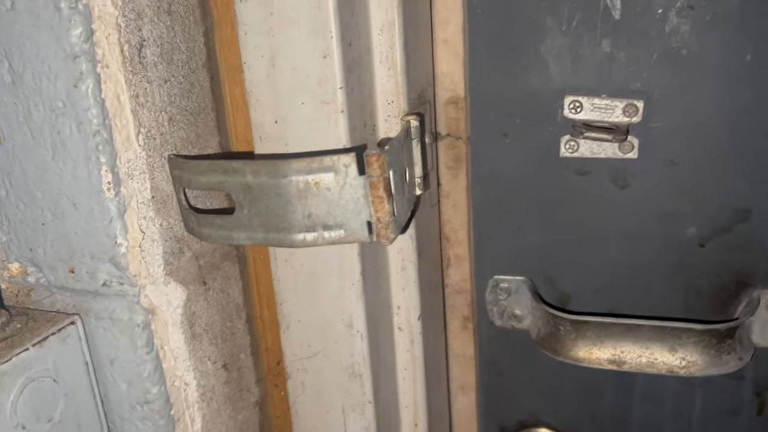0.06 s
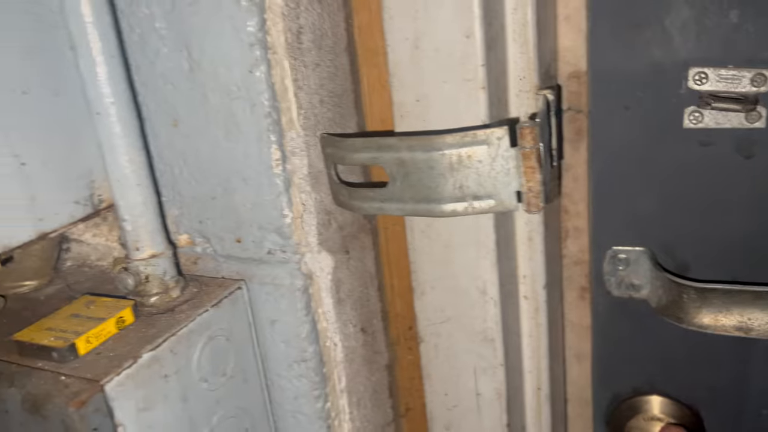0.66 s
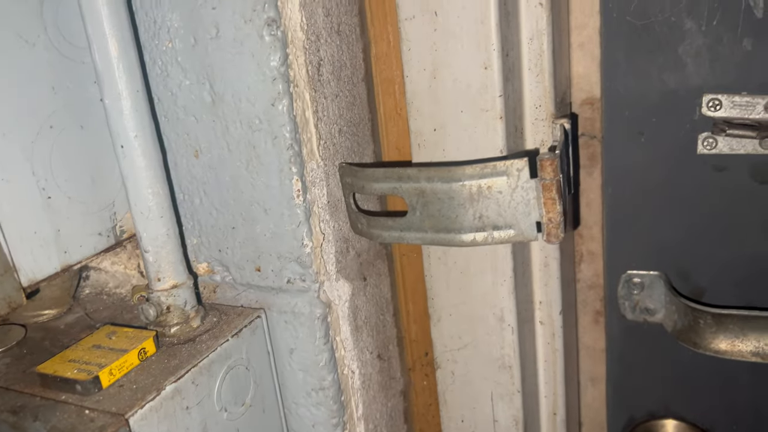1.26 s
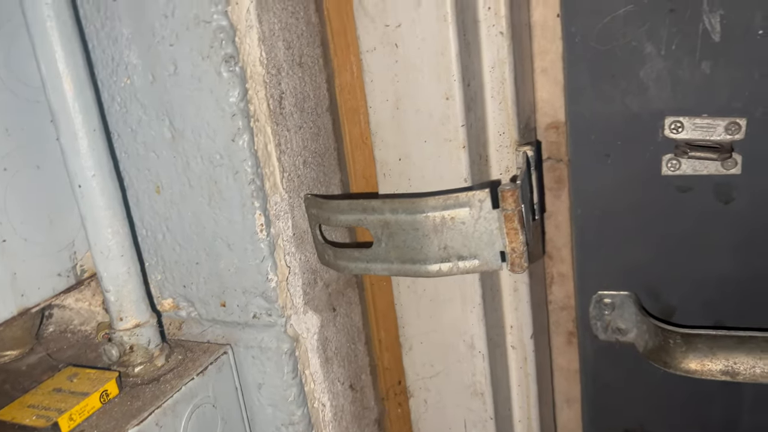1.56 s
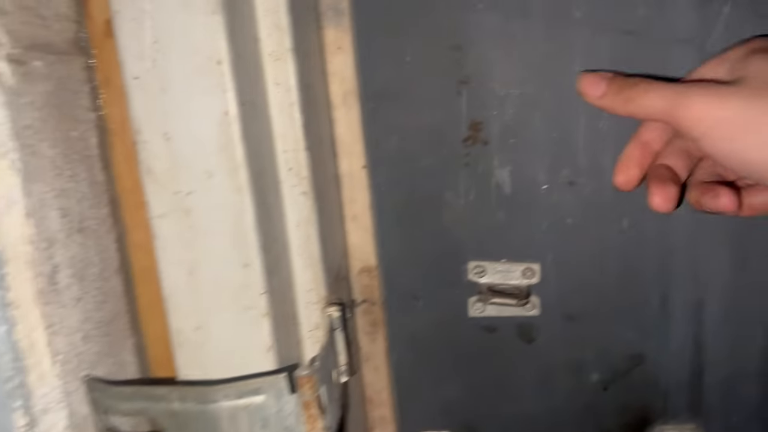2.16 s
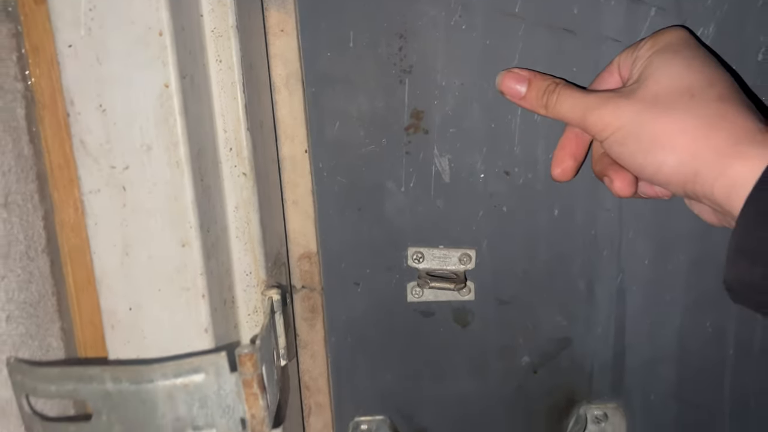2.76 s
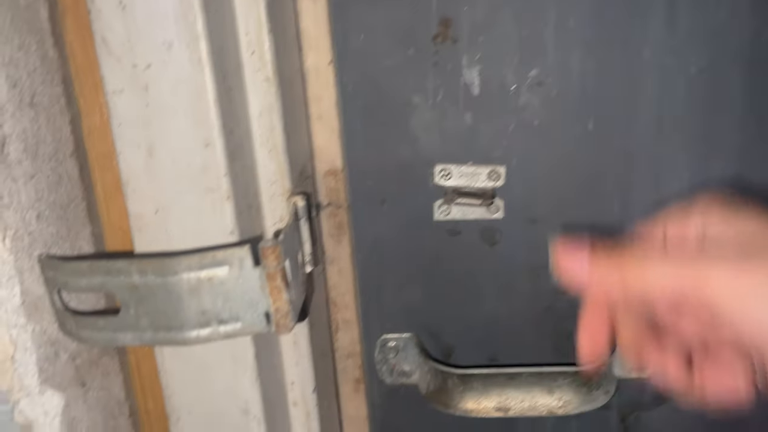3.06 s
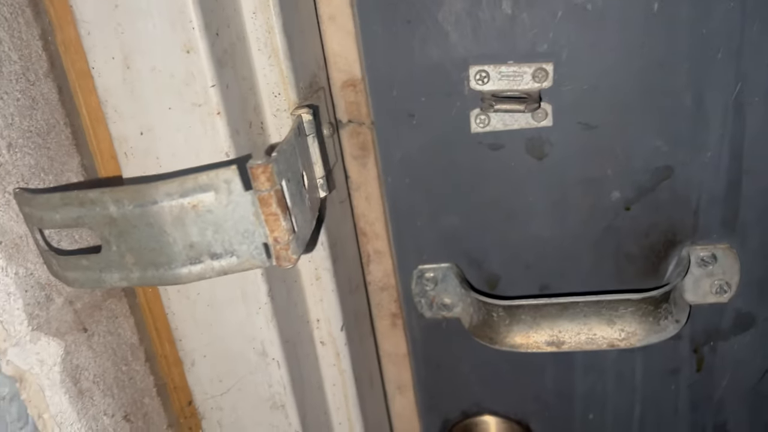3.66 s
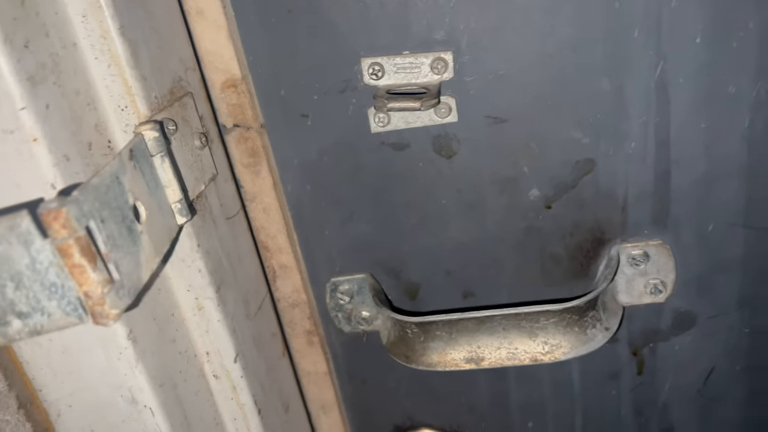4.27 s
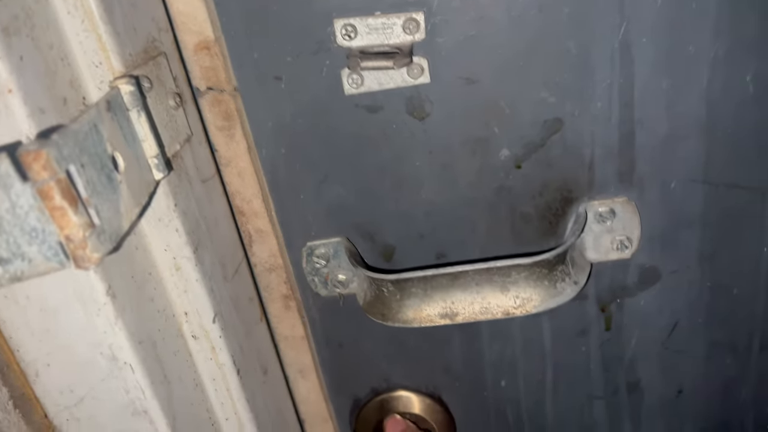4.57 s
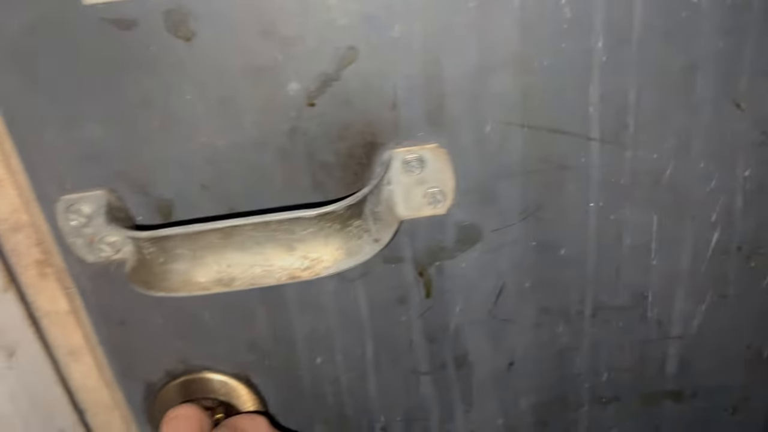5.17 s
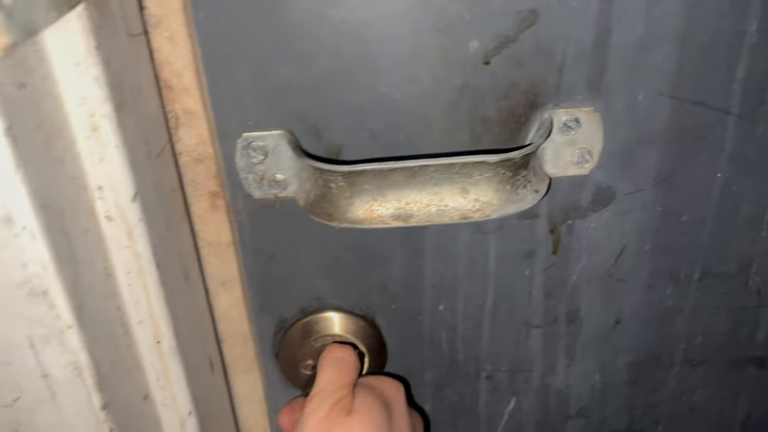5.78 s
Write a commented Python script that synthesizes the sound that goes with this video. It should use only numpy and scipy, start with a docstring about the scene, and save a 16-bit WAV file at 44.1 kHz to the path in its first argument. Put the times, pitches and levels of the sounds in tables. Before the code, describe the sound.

In a quiet corridor with a faint motor drone, mains hum and airy hiss, someone tests a locked metal door right by the microphone. Light knocks and sharp latch clicks come first. Then cloth swishes, a hand thumps the door, and it bangs against its frame with a deep boom and a short metallic ring. A lighter clang, soft pats, small clicks and a faint snap follow.

```python
"""A locked steel door tried by hand, close to a stereo microphone in a quiet building.
From the start, a distant motor drones and the mains hum over a soft hiss of air. After a dry snap
the latch chatters and scrapes, metal on metal, and the leaf knocks lightly against its frame.
Just after two seconds the sleeve swishes, the hand lands and the whole leaf booms and clangs.
One more clang follows near three seconds, then only soft bumps, pats, latch clicks and a last snap."""
import sys
import numpy as np
from scipy import signal
from scipy.fft import rfft, irfft, next_fast_len
from scipy.io import wavfile
from scipy.ndimage import uniform_filter1d

SR = 44100
rng = np.random.default_rng(int(sys.argv[2]) if len(sys.argv) > 2 else 0)


def transcribe(u):
    """Save the signal u as a 16-bit wav file named by the first command-line argument.

    u: samples, shape (n,) or (channels, n), limited to [-1, 1]; the rate is SR.
    q: integer samples, one column per channel.
    """
    v = np.clip(np.atleast_2d(u).T, -1, 1)
    q = np.round(v * 32767).astype(np.int16)
    wavfile.write(sys.argv[1], SR, q)


N = 265745

# Where the close sounds sit at the microphone. Each row: frequency in Hz, left minus right in dB.
CLOSE_LEAN = [(60, -0.5), (170, -1), (350, -5.5), (700, -4), (1200, 0.5), (2200, -3.5), (5000, 1),
              (15000, -2)]
# How alike noise is on the two channels. Each row: frequency in Hz, correlation from -1 to 1.
CORRELATION = [(60, 0.47), (130, 0.76), (290, 0.38), (640, -0.59), (1400, -0.34), (3000, 0.025),
               (7000, -0.17), (15000, -0.4)]
# Room tone of the building. Each row: frequency in Hz, relative density in dB.
AIR_COLOUR = [(22, -27), (48, -5), (100, 2), (170, -11.5), (520, -23.5), (1000, -17.5), (1480, -18),
              (1720, -14), (1900, -21), (2900, -38.5), (4000, -37.5), (5400, -51.5), (6500, -46.5),
              (7200, -36.5), (7550, -45.5), (8100, -34.5), (9600, -47), (15500, -49.5)]
# Where the room tone sits. Each row: frequency in Hz, left minus right in dB.
AIR_LEAN = [(60, -0.5), (200, -1), (400, -3.5), (800, 7.5), (1300, 8), (2300, 18.5), (4400, 12.5),
            (7200, 16.5), (9000, -5.5), (15000, 10)]
# Swells in the room tone's bass. Each row: time in seconds, bass gain in dB.
RUMBLE = [(0, 15), (.3, -5), (.6, 2), (1.1, -0.5), (2.2, 2.5), (6.03, 3.5)]
# The distant motor. Each row: time in seconds, level of the shaft tone in dB, of its octave in dB.
MOTOR_LEVELS = [(0, -73, -73), (.7, -52.5, -69), (1.6, -59.5, -69.5), (3.1, -52, -51), (4.5, -51, -54),
                (6.03, -58.5, -64)]
# Mains hum in the corridor. Each row: multiple of HUM_HZ, level in dB.
HUM_PARTIALS = [(2, -72.5), (4, -64.5), (5, -76.5), (6, -80.5), (7, -79), (9, -77.5), (10, -74.5),
                (11, -74.5), (12, -80)]
# Thin buzz of an electrical fitting. Each row: multiple of HUM_HZ, level in dB.
BUZZ_PARTIALS = [(25, -86.5), (30, -88.5), (31, -85), (33, -92), (34, -88), (37, -90.5), (67, -102.5)]
# Dry snaps close to the microphone. Each row: start in seconds, level in dB, t60 in seconds.
SNAPS = [(0.0126, -45, 0.0049), (2.365, -57.5, .03), (5.8792, -60.5, 0.023)]
# Colour of a snap. Each row: frequency in Hz, relative density in dB.
SNAP_COLOUR = [(300, 4), (2200, 1.5), (4500, -7), (7000, -4.5), (12000, -3), (15500, 4.5)]
# Latch and fittings click and scrape, too light to move the leaf. Each row: start in seconds,
# chatter length in seconds, favoured pitch in Hz, strength in dB, tilt in dB per octave.
LATCH_CONTACTS = [ (0.082, .030, 2180, -52.5, -1.04), (1.087, 0.0052, 400, -68.5, -5.4),
                  (1.102, 0.044, 1850, -54, -3), (1.138, 0.0096, 2080, -41.5, 0.1),
                  (1.475, .002, 256, -60.5, -4), (1.513, .002, 1310, -65, -6),
                  (2.322, 0.021, 825, -68, -6.5), (2.363, 0.0027, 2380, -65.5, -4.5),
                  (2.4, 0.0069, 3750, -38, -2.5), (2.884, 0.021, 1070, -62, -4),
                  (3.819, .002, 850, -70.5, -7.5), (5.055, 0.016, 775, -57, -5.5),
                  (5.217, 0.024, 1090, -58, -2), (5.239, 0.0095, 2400, -60, 0)]
# The leaf hits its frame; a harder blow has a flatter tilt. Each row: start in seconds, chatter length
# in seconds, favoured pitch in Hz, strength in dB, tilt in dB per octave, thump of the leaf in dB.
FRAME_KNOCKS = [ (0.397, .012, 1270, -47.5, -7, -54), (0.524, .003, 2200, -56, -8, -58),
                (0.530, .006, 1290, -50, -5.5, -42.5), (0.587, .004, 220, -78.5, -8.5, -52),
                (1.542, .003, 150, -70.5, -3.5, -47), (2.172, .002, 563, -65.5, -12.5, -33),
                (2.191, .005, 172, -63.5, -10.5, -30), (2.404, .006, 284, -36, -4, -16.5),
                (2.920, .003, 2420, -45.5, -3.5, -40.5), (2.927, .005, 440, -52.5, -8, -34),
                (3.125, .014, 460, -68, -5, -61)]
# Soft bumps of the door. Each row: start in seconds, strength in dB.
BUMPS = [(1.443, -73), (3.7, -85), (4.038, -84.5), (4.439, -84), (5.017, -65.5), (5.406, -76.5)]
# Modes of the steel leaf and its fittings. Each row: frequency in Hz, weight in dB, t60 in seconds.
DOOR_MODES = [(145.2, 9, 0.33), (166, -16, 0.8), (228.5, 2.5, 0.3), (280.7, 6, 0.17), (323.8, -1.5, 0.29),
              (421, -4, 0.24), (472.5, -2.5, 0.16), (508.5, -5.5, 0.16), (616, -2.5, 0.17), (664.4, 1, 0.1),
              (738, 2, 0.16), (903, -10, 0.29), (990, 1.5, 0.14), (1180, 14, 0.11), (1282, -1, 0.34),
              (1342, 4.5, 0.15), (1386, 2, 0.23), (1715, -3, 0.33), (1845, 0, 0.17), (1960, -1, 0.036),
              (1955, 2.5, 0.22), (2180, -6, 0.21), (2365, -1, 0.22), (2522, 2, 0.09), (2920, 0, 0.12),
              (3216, 5.5, 0.14), (4310, 4.5, 0.22), (4600, 3, 0.26), (5550, -13, 0.15), (6078, 1, 0.21),
              (6440, 2, 0.37)]
# Dense, quickly dying vibration of the steel sheet. Each row: frequency in Hz, relative density in dB.
SHEET_COLOUR = [(40, 10), (130, 0.5), (280, 0), (390, -2.5), (700, -0.5), (900, 1), (1400, 0), (2400, 3.5),
                (3300, -7), (4700, 1.5), (6800, -16), (9000, -24), (12000, -27), (15500, -23.5)]
# The door's body, clank, clang, click and tick. Each row: low and high edge in Hz, rise and t60
# in seconds, relative level of the room tail in dB, of the clear modes in dB.
REGISTERS = [(167.3, 427, 0.0013, 0.12, -10.5, 0), (504, 1002, 0.0011, 0.077, -15, -3),
             (1286, 2160, 0.00061, 0.11, -16.5, -5), (2550, 3650, 0.002, 0.063, -17.5, -5.5),
             (6520, 33000, 0.00041, 0.07, -17, -42)]
# How readily each register sounds, before the tilt. Each row: middle frequency in Hz, gain in dB.
REGISTER_RESPONSE = [(250, 0), (700, 3), (1700, 5.5), (3500, -1.2), (11000, 0)]
# Moves of the arm. Each row: fastest moment in seconds, level in dB, swell and fade time in seconds.
SWISHES = [(1.78, -65.5, 0.14), (2.22, -52.5, .035), (2.41, -49, 0.058), (2.89, -56, 0.037),
           (3.25, -69.5, 0.24), (5.02, -73, .05)]
# Colour of the rubbing cloth. Each row: frequency in Hz, relative density in dB.
SLEEVE_COLOUR = [(300, 6), (2000, 19), (4000, 10), (6000, 2.5), (9000, 3.5), (12000, 3.5), (14000, 15.5),
                 (16000, 8)]
# The hand lands on the leaf. Each row: start in seconds, pitch in Hz, level in dB, t60 in seconds.
PATS = [(2.1697, 528, -39.5, 0.053), (2.174, 150, -36.5, 0.073), (5.017, 303, -47, 0.034),
        (5.408, 295, -64, 0.042)]

HUM_HZ, MOTOR_HZ = 119.98, 47.6
ROOM_T60 = 0.34  # seconds for the corridor to fall by 60 dB


def amp(db):
    """Decibels to gain."""
    return 10 ** (np.asarray(db) / 20)


def unit_rms(x):
    """Scales to rms 1."""
    return x / np.sqrt(np.mean(x ** 2) + 1e-20)


def unit_blow(x):
    """Scales a blow so that its energy equals rms 1 held for 60 ms."""
    return x / np.sqrt(np.mean(x ** 2) * x.shape[-1] / (.06 * SR) + 1e-20)


def decay(t, t60):
    """Falls by 60 dB in t60 seconds."""
    return np.exp(-np.log(1000) * t / t60)


def at_hz(table, hz):
    """Reads a spectrum table along a log-frequency axis."""
    frequencies, values = np.transpose(table)
    return np.interp(np.log(hz + 1), np.log(frequencies), values)


def curves(table):
    """The columns of a time table at every sample."""
    times, *columns = np.transpose(table)
    return [np.interp(np.arange(N) / SR, times, column) for column in columns]


def add(mix, start, sound):
    """Mixes a sound in at a start in seconds."""
    part = mix[:, max(round(start * SR), 0):][:, :sound.shape[1]]
    part += sound[:, :part.shape[1]]


def sides(lean, hz):
    """Left and right gains for a table of level differences."""
    return amp(np.outer([.5, -.5], at_hz(lean, hz)))


def noise(size, colour, lean):
    """Coloured stereo noise, alike on both channels in the bass only."""
    hz = np.fft.rfftfreq(size, 1 / SR)
    spectra = rfft(rng.standard_normal((2, size)))
    alike = np.clip(at_hz(CORRELATION, hz), -1, 1)
    spectra[1] = alike * spectra[0] + np.sqrt(1 - alike ** 2) * spectra[1]
    return unit_rms(irfft(spectra * amp(at_hz(colour, hz)) * sides(lean, hz), size))


def drift(top_hz):
    """A random wander of rms 1, no faster than top_hz."""
    t = np.linspace(0, N / SR, num=600)
    rates = np.geomspace(top_hz / 10, top_hz, num=16)
    wave = sum(np.sin(2 * np.pi * (hz * t + rng.random())) / np.sqrt(hz) for hz in rates)
    return np.interp(np.arange(N) / SR, t, unit_rms(wave))


def room_tone(base_db=-53, bass_hz=350):
    """Still air hisses around the microphone while its bass swells and sinks."""
    air = amp(base_db) * noise(next_fast_len(N), AIR_COLOUR, AIR_LEAN)[:, :N]
    bass = signal.sosfiltfilt(signal.butter(2, bass_hz, fs=SR, output="sos"), air)
    return air + bass * (amp(curves(RUMBLE)[0]) - 1)


def motor(waver_db=0.75, speed_wander=0.0039):
    """A distant motor drones, dead centre, at its shaft rate and the octave above."""
    turns = np.cumsum(MOTOR_HZ * (1 + speed_wander * drift(8.22))) / SR
    return np.sqrt(2) * sum(amp(db + waver_db * drift(6.7)) * np.sin(2 * np.pi * order * turns)
                            for order, db in enumerate(curves(MOTOR_LEVELS), 1))


def mains_hum(waver_db=0.2, skew_rad=1.2):
    """Hum and buzz stand in the corridor and reach the two channels out of step."""
    cycles, skew = HUM_HZ * np.arange(N) / SR, np.array([[0], [skew_rad]])
    out = np.zeros((2, N))
    for multiple, db in HUM_PARTIALS + BUZZ_PARTIALS:
        peak = np.sqrt(2) * amp(db - waver_db * drift(1.9))
        out += peak * np.sin(2 * np.pi * (multiple * cycles + rng.random()) + skew)
    return out


def snaps(tail_db=-18.5, tail_t60=0.19):
    """Brief bright bursts close to the microphone, with a faint room tail."""
    t, out = np.arange(8192) / SR, np.zeros((2, N))
    for start, db, t60 in SNAPS:
        fade = decay(t, t60) + amp(tail_db) * decay(t, tail_t60)
        add(out, start, amp(db) * unit_blow(noise(len(t), SNAP_COLOUR, CLOSE_LEAN) * fade))
    return out


def chatter(length_s, per_second=350, rebound=0.31):
    """Energy of a first contact, then of uneven smaller ones while metal skids on metal."""
    jitter, size = rng.random((40, 2)).T
    times = (np.arange(len(jitter)) + jitter + .5) / per_second
    contacts = np.zeros(int(length_s * SR) + 2)
    contacts[0] = 1
    live = times < length_s
    contacts[(times[live] * SR).astype(int)] = (rebound * (.5 + size) ** 2)[live]
    return contacts


def register(hz, low_hz, high_hz):
    """Smooth, steep-sided weight of one range of pitches."""
    return 1 / np.sqrt((1 + (low_hz / (hz + 1)) ** 12) * (1 + (hz / high_hz) ** 12))


def favour(hz, pitch_hz, lift_db=6, octaves=0.18):
    """The striking point drives the door hardest near one pitch."""
    return amp(lift_db * np.exp(-.5 * (np.log2((hz + 1) / pitch_hz) / octaves) ** 2))


def contact_gain(middle_hz, pitch_hz, strength_db, tilt_db, pivot_hz=1000):
    """A soft contact gives less to the high registers; those around the favoured pitch get more."""
    tilted = amp(strength_db + tilt_db * np.log2(middle_hz / pivot_hz))
    return tilted * favour(middle_hz, pitch_hz, lift_db=5, octaves=0.55)


def mode_weights(scatter_db=2, apart_hz=1000):
    """Each blow weighs the modes anew, and short waves reach the two channels out of step."""
    hz, db, _ = np.transpose(DOOR_MODES)
    scatter, phase, side = rng.standard_normal((len(hz), 3)).T
    skew = np.sign(side) * np.minimum(hz / apart_hz, 1) * np.pi / 2
    angle = 2 * np.pi * phase + np.outer([.5, -.5], skew)
    return amp(db + scatter_db * scatter) * sides(CLOSE_LEAN, hz) * np.exp(1j * angle)


def strike(t, rings, length_s, pitch_hz, strength_db, tilt_db, thump_db=None):
    """Contacts shake the sheet and its modes: a crack, a short ring, then the room holds on."""
    sheet = noise(len(t), SHEET_COLOUR, CLOSE_LEAN)
    hz, mode_hz = np.fft.rfftfreq(len(t), 1 / SR), np.transpose(DOOR_MODES)[0]
    sheet_drive = rfft(sheet) * favour(hz, pitch_hz)
    mode_drive = mode_weights() * favour(mode_hz, pitch_hz)
    contacts = chatter(length_s)
    # the modes gather energy with every contact
    gathered = np.sqrt(np.interp(t, np.arange(len(contacts)) / SR, np.cumsum(contacts)))
    crack = amp(-2) * decay(t, t60=0.014)
    out = np.zeros_like(sheet) if thump_db is None else amp(thump_db) * thump(t, sheet)
    for (middle_hz, db), (*edges_hz, rise, t60, room_db, modes_db) in zip(REGISTER_RESPONSE, REGISTERS):
        onset = (1 - np.exp(-t / rise)) ** 2
        energy = decay(t, t60) ** 2 + crack ** 2 + (amp(room_db) * decay(t, ROOM_T60)) ** 2
        shaking = np.sqrt(abs(signal.oaconvolve(energy * onset ** 2, contacts)[:len(t)]))
        dense = irfft(sheet_drive * register(hz, *edges_hz)) * shaking
        clear = ((mode_drive * register(mode_hz, *edges_hz)) @ rings).real
        clear *= onset * uniform_filter1d(gathered, size=200)
        gain = amp(db) * contact_gain(middle_hz, pitch_hz, strength_db, tilt_db)
        out += gain * unit_blow(unit_blow(dense) + amp(modes_db) * unit_blow(clear))
    return out


def thump(t, sheet, flex_hz=76, swell_s=0.017, boom_hz=(44.5, 143), boom_db=-11, boom_t60=0.42):
    """The whole leaf flexes for a few cycles and leaves the corridor booming."""
    flex = -np.sin(2 * np.pi * flex_hz * t) * (t / swell_s * np.exp(-t / swell_s)) ** 2
    boom_band = signal.butter(4, boom_hz, btype="band", fs=SR, output="sos")
    boom = signal.sosfilt(boom_band, sheet * (1 - np.exp(-t / swell_s)) * decay(t, boom_t60))
    return unit_blow(flex) + amp(boom_db) * unit_blow(boom)


def door(flutter=0.56):
    """Close up, latch, knocks and bumps all ring the same modes, which reflections make flutter."""
    t, out = np.arange(24576) / SR, np.zeros((2, N))
    hz, _, t60 = np.transpose(DOOR_MODES)
    white = rng.standard_normal((2, len(hz), len(t)))
    ripple = unit_rms(uniform_filter1d(uniform_filter1d(white, size=500), size=400))
    reflections = 1 + flutter * (ripple[0] + 1j * ripple[1])
    rings = np.exp(2j * np.pi * np.outer(hz, t)) * decay(t, t60[:, None]) * reflections
    for start, *contact in FRAME_KNOCKS + LATCH_CONTACTS:
        add(out, start, strike(t, rings, *contact))
    for start, db in BUMPS:
        add(out, start, strike(t, rings, length_s=.003, pitch_hz=273, strength_db=db, tilt_db=-9.5))
    return out


def sleeve(rest_db=-78, grain_db=2):
    """Cloth near the microphone hisses unevenly, swelling and fading with each move of the arm."""
    t = np.arange(N) / SR
    swish_power = sum((amp(db) * np.exp(-abs(t - peak) / swell)) ** 2 for peak, db, swell in SWISHES)
    cloth = noise(next_fast_len(N), SLEEVE_COLOUR, CLOSE_LEAN)[:, :N]
    return cloth * np.sqrt(amp(rest_db) ** 2 + swish_power) * amp(grain_db * drift(40))


def hand_pats(rise_s=0.001, lag_rad=0.74):
    """The hand hits the leaf and damps it at once: a few hollow cycles, slightly later on the left."""
    t, out = np.arange(8192) / SR, np.zeros((2, N))
    for start, hz, db, t60 in PATS:
        tone = np.sin(2 * np.pi * hz * t - np.array([[lag_rad], [0]]))
        envelope = (1 - np.exp(-t / rise_s)) * decay(t, t60)
        add(out, start, amp(db) * unit_blow(tone * envelope * sides(CLOSE_LEAN, np.array([hz]))))
    return out


def scene():
    """Door, hand and arm close to the microphone, the building behind them."""
    close = door() + hand_pats() + snaps() + sleeve()
    return close + room_tone() + motor() + mains_hum()


def record(dry):
    """The recorder cuts the treble above 15.9 kHz."""
    low_pass = signal.firwin(511, 15900, window=("kaiser", 9), fs=SR)
    return signal.oaconvolve(dry, low_pass[None], "same", axes=1)


dry = scene()
out = record(dry)
transcribe(out)
```